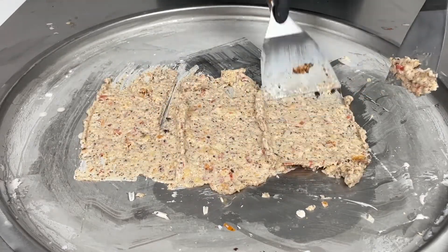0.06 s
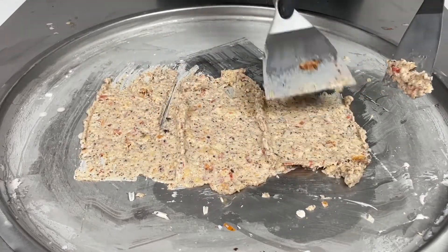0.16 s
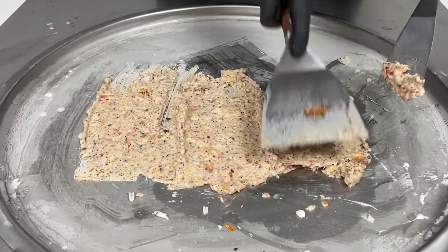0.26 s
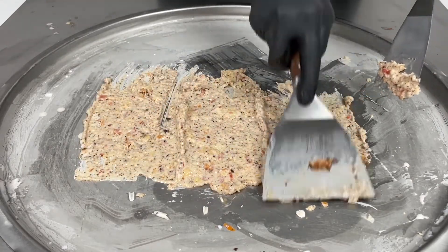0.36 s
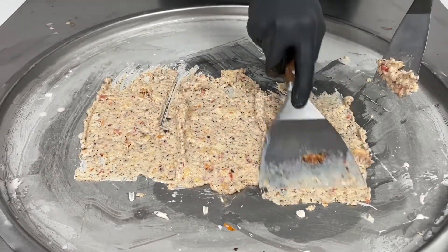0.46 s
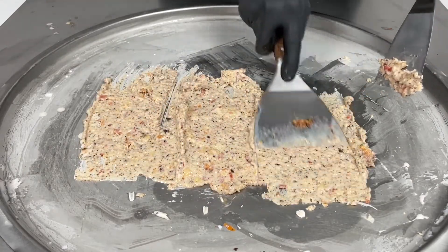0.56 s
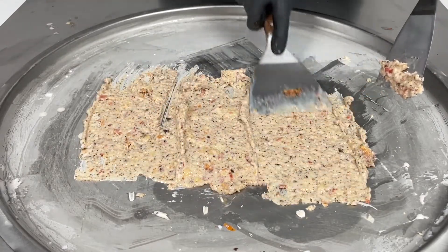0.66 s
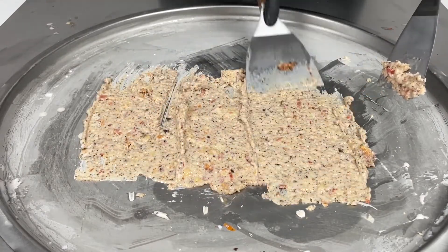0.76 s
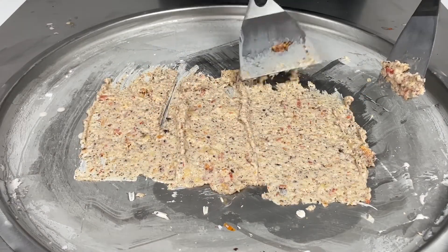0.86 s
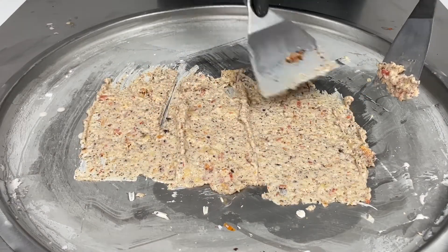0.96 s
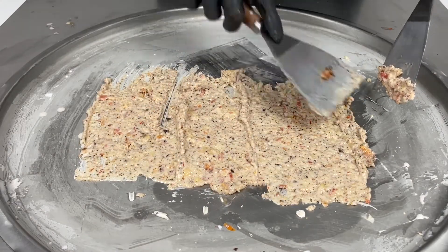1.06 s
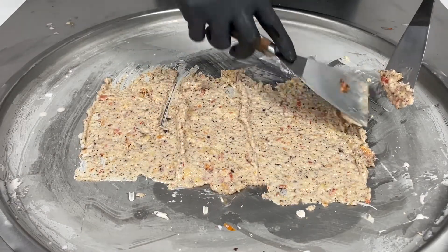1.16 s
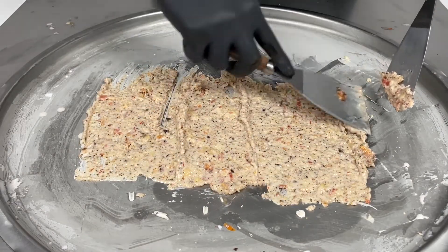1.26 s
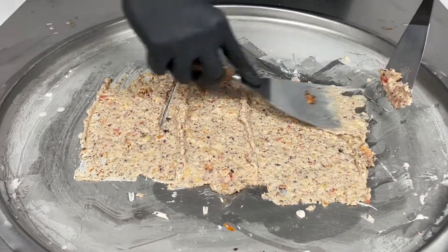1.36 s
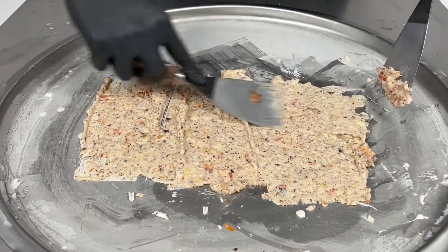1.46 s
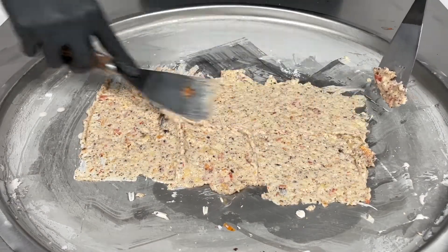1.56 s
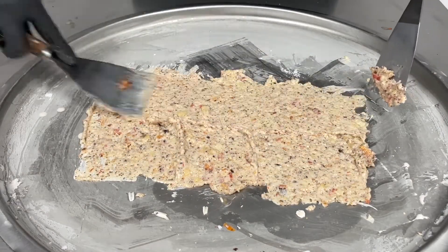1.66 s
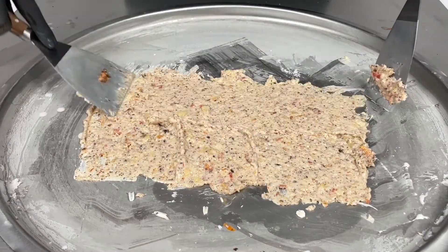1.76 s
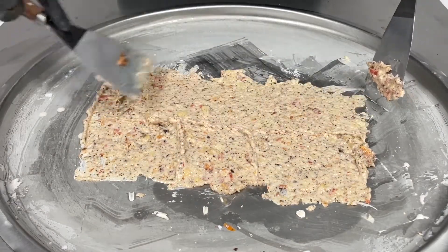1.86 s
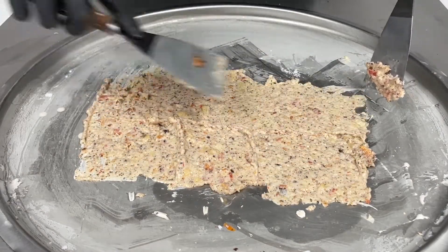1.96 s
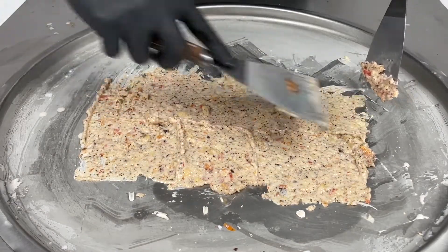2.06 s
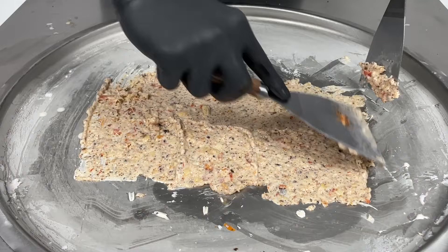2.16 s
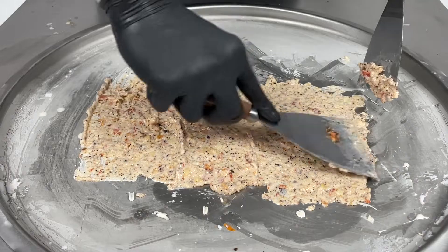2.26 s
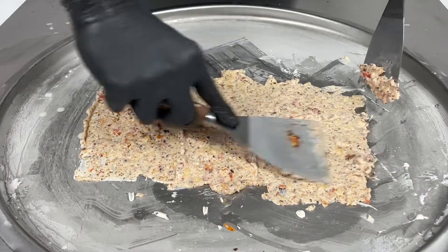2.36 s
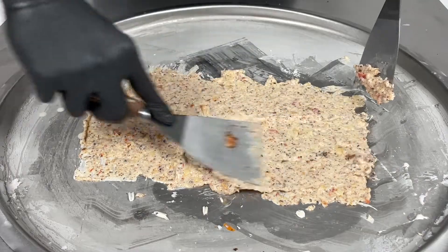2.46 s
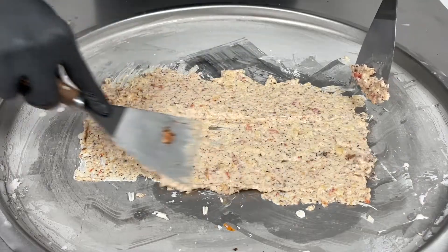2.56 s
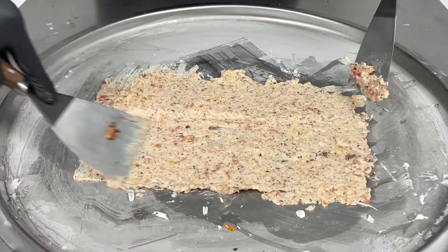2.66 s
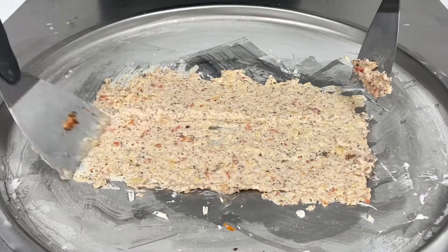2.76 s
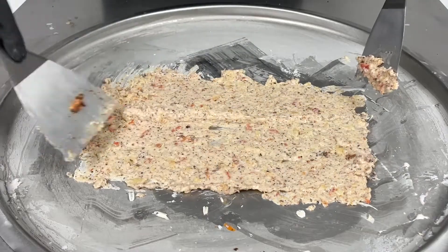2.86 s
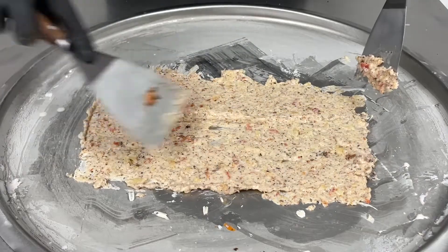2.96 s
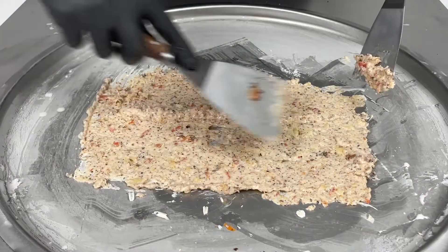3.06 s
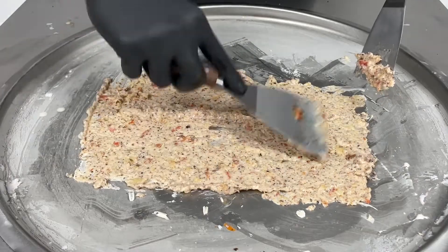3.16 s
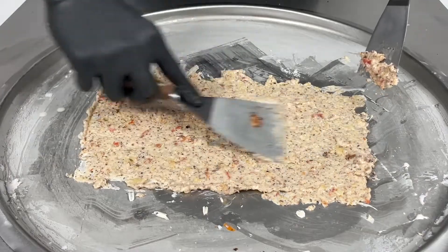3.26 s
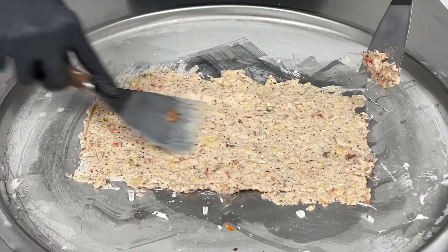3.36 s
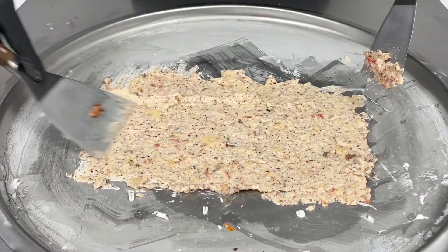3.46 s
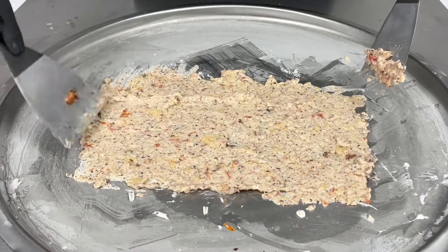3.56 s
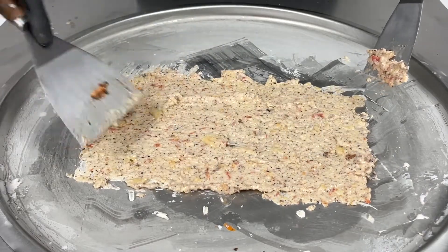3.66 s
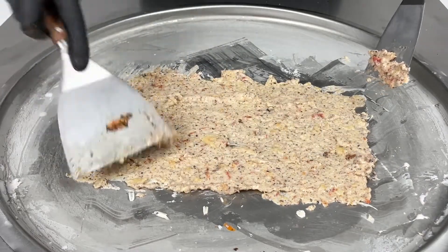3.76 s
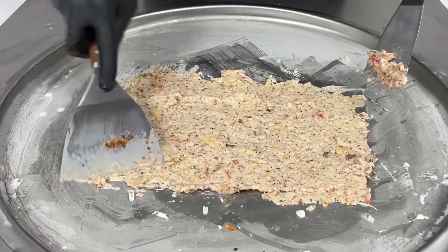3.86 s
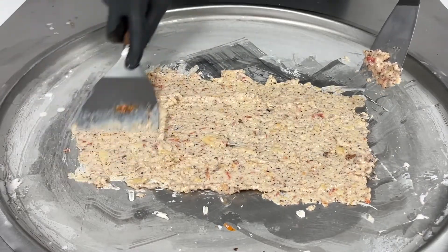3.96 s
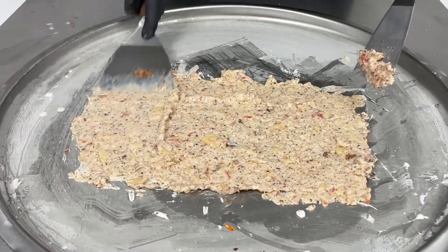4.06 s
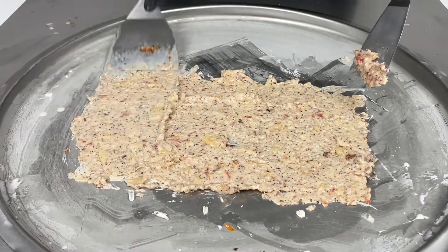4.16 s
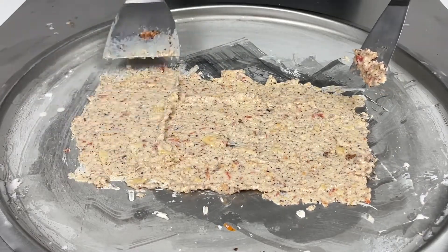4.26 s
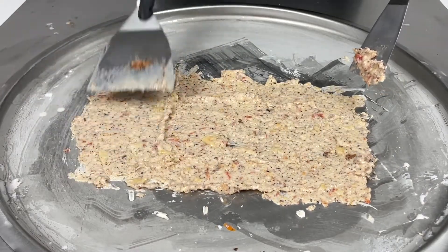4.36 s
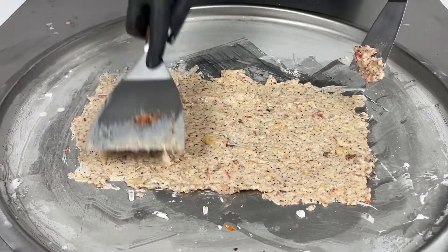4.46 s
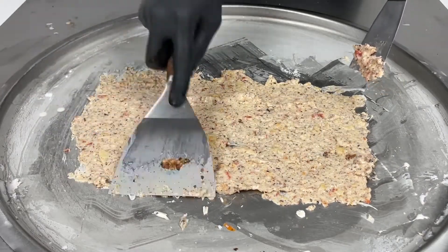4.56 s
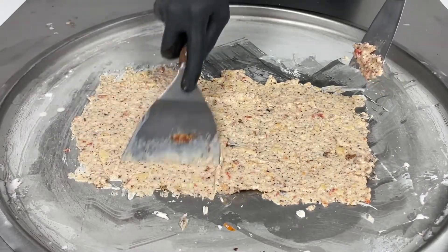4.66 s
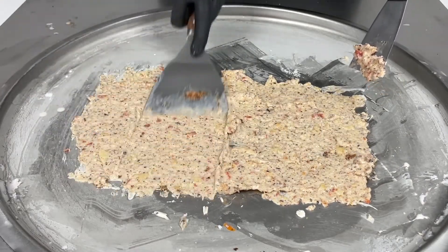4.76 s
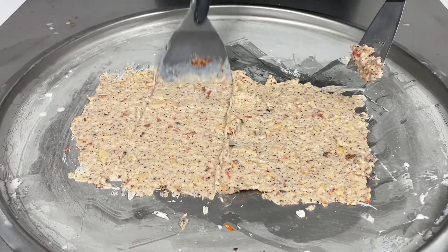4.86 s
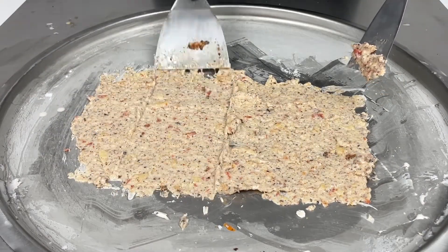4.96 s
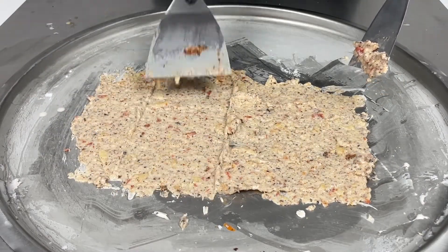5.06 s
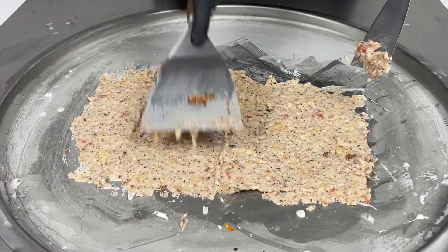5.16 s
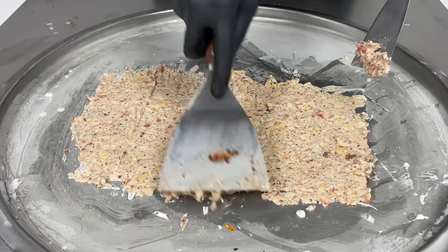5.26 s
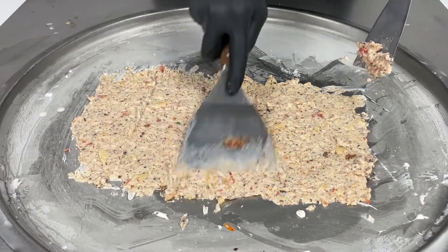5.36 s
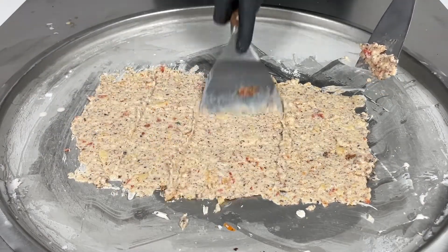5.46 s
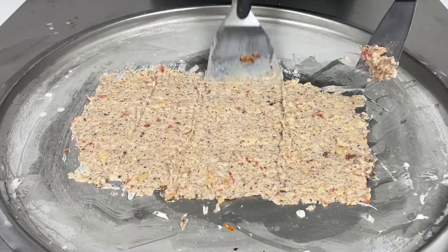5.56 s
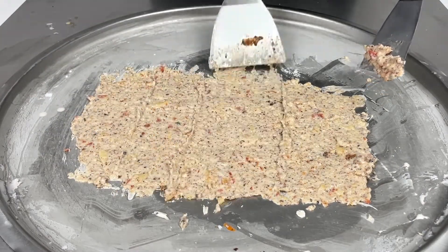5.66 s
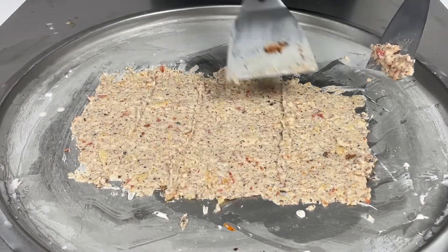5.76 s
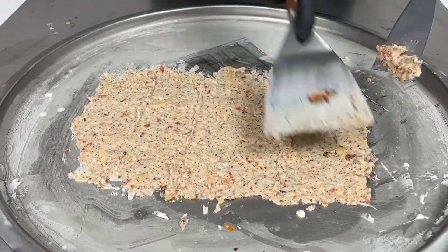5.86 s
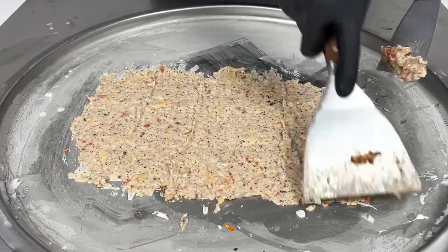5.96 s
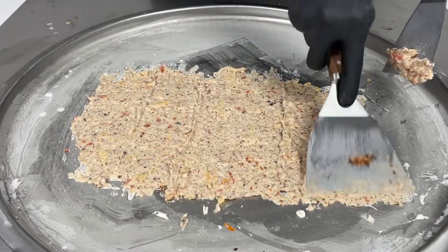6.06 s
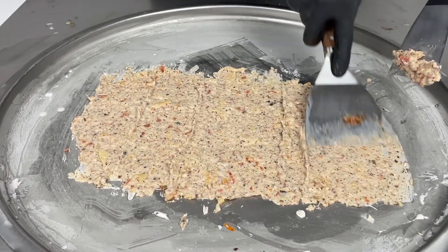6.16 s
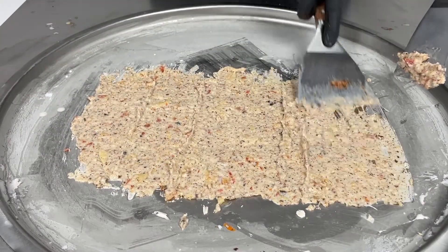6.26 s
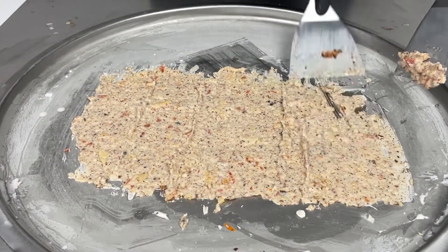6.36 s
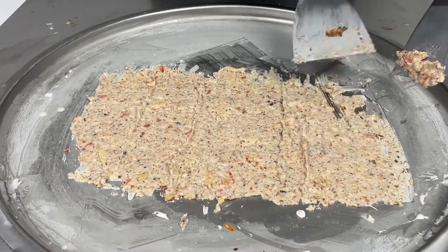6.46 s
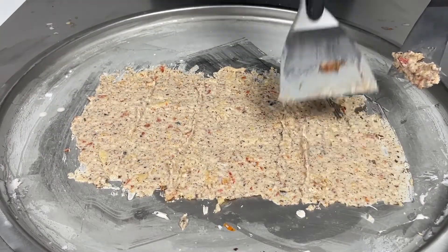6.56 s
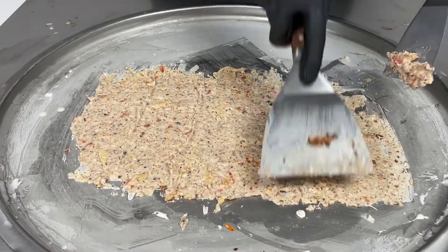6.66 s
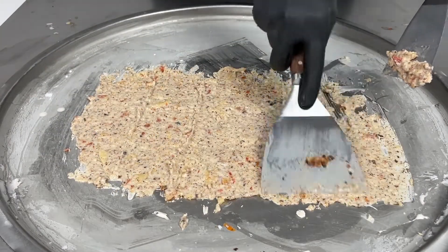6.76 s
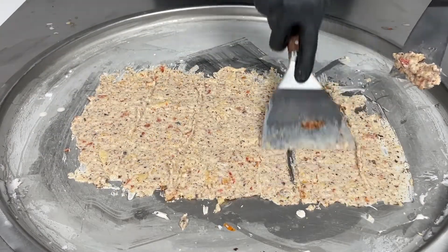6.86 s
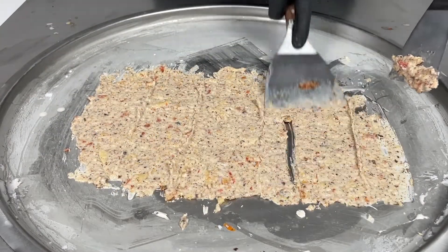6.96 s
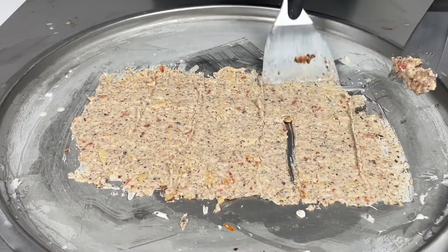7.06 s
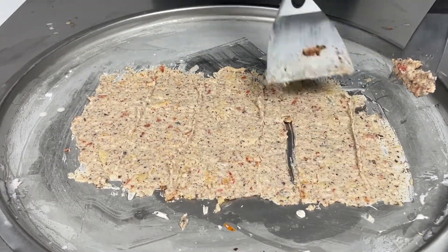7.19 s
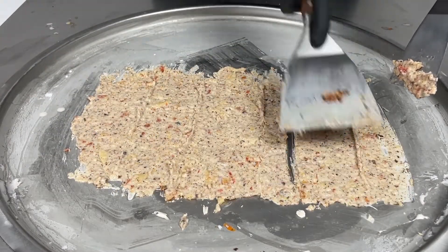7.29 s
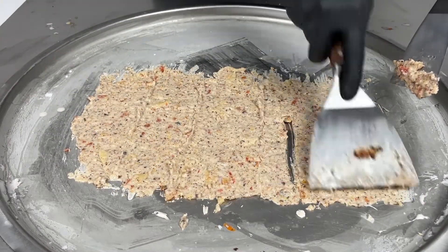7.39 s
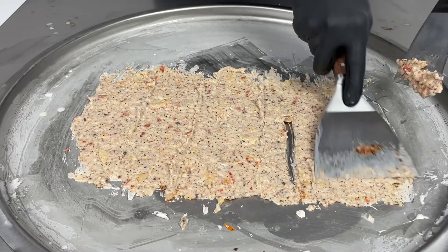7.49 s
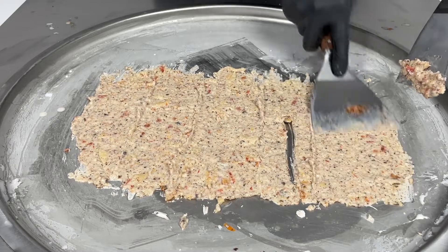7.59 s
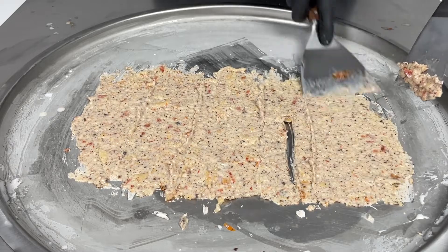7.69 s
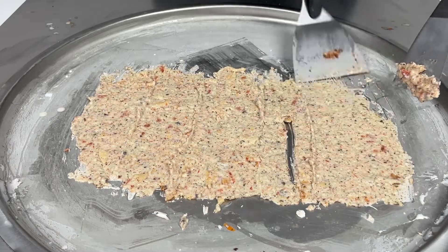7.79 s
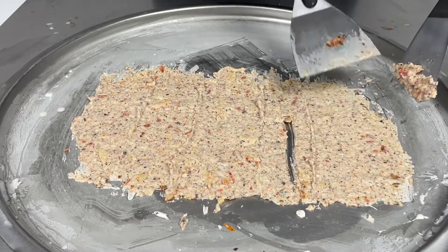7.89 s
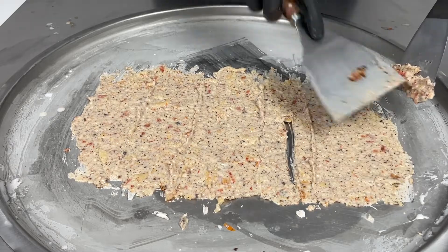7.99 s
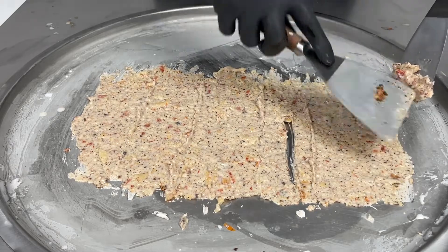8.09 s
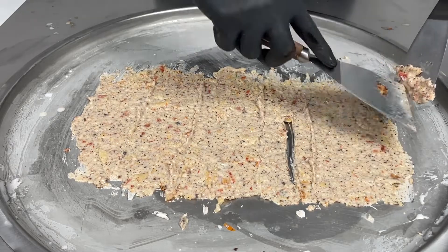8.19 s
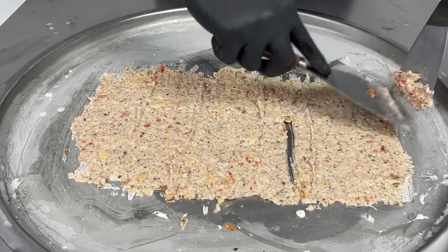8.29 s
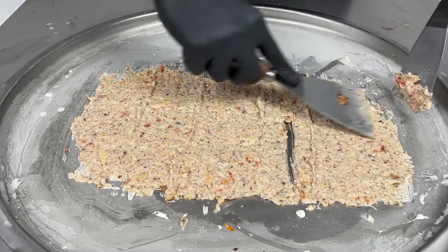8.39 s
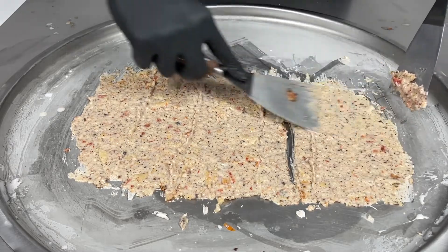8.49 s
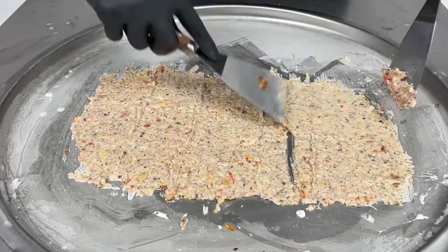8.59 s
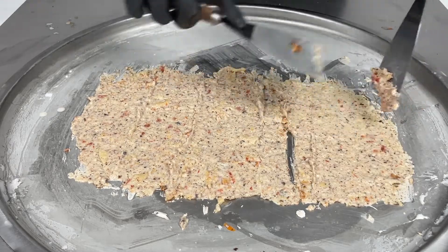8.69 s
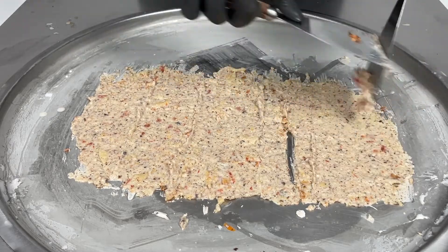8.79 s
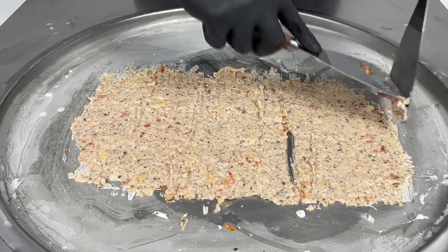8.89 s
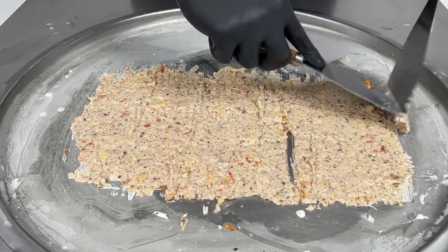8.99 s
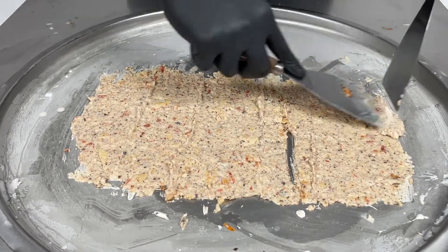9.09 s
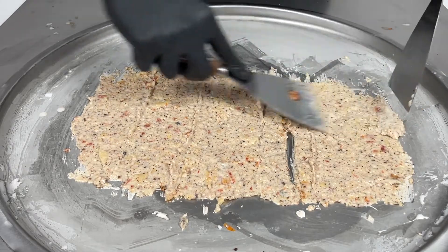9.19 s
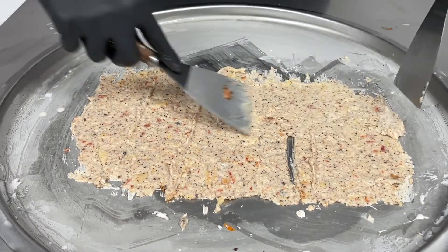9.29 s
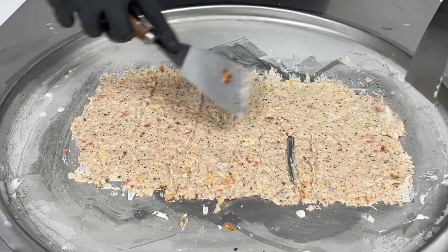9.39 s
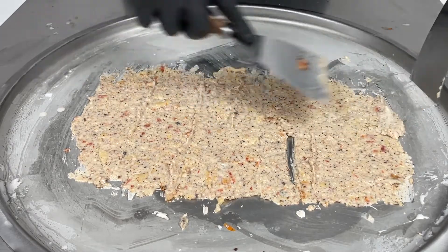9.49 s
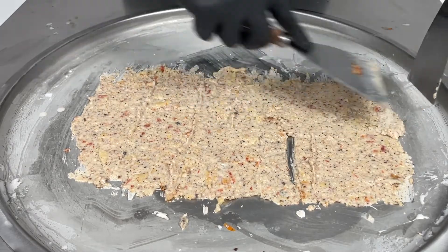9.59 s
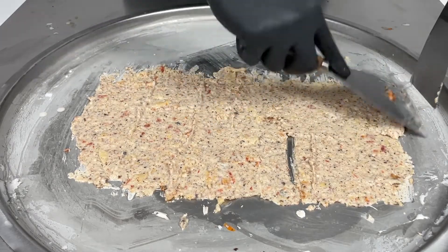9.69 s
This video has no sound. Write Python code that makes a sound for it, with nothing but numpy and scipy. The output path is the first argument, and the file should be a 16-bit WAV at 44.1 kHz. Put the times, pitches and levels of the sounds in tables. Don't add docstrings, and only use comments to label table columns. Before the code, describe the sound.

Short gritty scraping strokes on a cold steel plate, crumbs fizzing and lumps snapping, over chiller hum; later a tap and a hard metallic clack.

```python
import sys
import numpy as np
from scipy import signal
from scipy.fft import rfft, irfft, next_fast_len
from scipy.io import wavfile
from scipy.ndimage import uniform_filter1d, map_coordinates

SR = 44100
rng = np.random.default_rng(int(sys.argv[2]) if len(sys.argv) > 2 else 0)


def gain_from_db(level_db):
    decades = np.asarray(level_db, float) / 20
    return 10 ** decades


def persist_wave(psi):
    counts = np.round(np.clip(psi, -1, 1) * 32767).astype(np.int16)
    wavfile.write(sys.argv[1], SR, np.atleast_2d(counts).T)


N = 429093


def unit(x):
    return x / np.sqrt(np.mean(x ** 2) + 1e-20)


def along(points, hz):
    f, v = np.transpose(points)
    return np.interp(np.log(hz + 1), np.log(f + 1), v)


def wobble(rate):
    knots = rng.standard_normal(int(N * rate / SR) + 4)
    return map_coordinates(knots, [np.arange(N) * rate / SR])


def filtered(x, response):
    m = next_fast_len(len(x) + 4096)
    return irfft(rfft(x, m) * response(np.fft.rfftfreq(m, 1 / SR)), m)[:len(x)]


def coloured(x, spectrum):
    return unit(filtered(x, lambda hz: gain_from_db(along(spectrum, hz))))


def resonant(x, peaks):
    def response(f):
        total = 0
        for k, (centre, width, db) in enumerate(peaks):
            damping = 1j * f * width
            total = total + (-1) ** k * gain_from_db(db) * damping / (centre ** 2 - f * f + damping)
        return total
    return filtered(x, response)


def hollow(x):
    gap_hz = 12500
    return filtered(x, lambda f: (gap_hz ** 2 - f * f + 1j * f * 800) / (gap_hz ** 2 - f * f + 1j * f * 3500))


def grit(rate, spread_db, bed, life):
    hits = rng.random(N) < rate / SR * gain_from_db(2.5 * wobble(40))
    size = gain_from_db(np.minimum(spread_db * rng.exponential(1, N), 8))
    puffs = signal.lfilter([1], [1, -np.exp(-1 / (life * SR))], hits * size)
    return (unit(puffs) + bed) * rng.standard_normal(N)


def patchy(x, depth_db):
    z = signal.stft(x, nperseg=256)[2]
    field = uniform_filter1d(rng.standard_normal(z.shape), size=5, axis=0)
    field = uniform_filter1d(field, size=7, axis=1)
    return unit(signal.istft(z * gain_from_db(depth_db * unit(field)), nperseg=256)[1][:N])


def add(track, s, sound):
    part = track[round(s * SR):][:len(sound)]
    part += sound[:len(part)]


# f/Hz, t60/s
REVERB_TIME = [(150, 0.75), (1000, 0.53), (4000, 0.67), (9000, 0.4), (16000, 0.24)]


def kitchen(x):
    hz, t, z = signal.stft(rng.standard_normal(int(0.98 * SR)), SR, nperseg=256)
    decay = gain_from_db(-60 * t / along(REVERB_TIME, hz)[:, None])
    tail = signal.istft(z * decay, SR, nperseg=256)[1]
    return signal.fftconvolve(np.pad(x, (300, 0)), tail / np.linalg.norm(tail))[:len(x)]


def blow(contacts, modes, colour, ring_db, crack_s, wet_db, blur_hz):
    start = contacts[0][0]
    cracks, rings, t = np.zeros(SR), np.zeros(SR), np.arange(SR // 2) / SR
    for s, db, more_db in contacts:
        noise = coloured(rng.standard_normal(len(t)), colour)
        onset = 1 - np.exp(-t / (crack_s / 40))
        add(cracks, s - start, gain_from_db(db - 8.0 - 60 * t / crack_s) * onset * noise)
        steps = rng.standard_normal((len(modes), len(t)))
        drift = np.sqrt(2 * np.pi * blur_hz / SR) * np.cumsum(steps, axis=1)
        drift = uniform_filter1d(drift, size=48, axis=1)
        ring = np.zeros(len(t))
        for (hz, level, t60), turn in zip(modes, drift):
            decay = gain_from_db(level + rng.normal(0, 1.5) - 60 * t / t60)
            ring += decay * np.sin(2 * np.pi * hz * t + turn)
        add(rings, s - start, gain_from_db(db + ring_db + more_db) * ring)
    spread = coloured(signal.unit_impulse(SR, idx=300), colour) * np.std(cracks)
    both = cracks + rings + gain_from_db(wet_db) * kitchen(spread + rings)
    out, low_hz = np.zeros(N), 1.05 * colour[0][0]
    add(out, start, filtered(both, lambda hz: (1j * hz / (low_hz + 1j * hz)) ** 2))
    return out


# f/Hz, level/dB
AIR_COLOUR = [(25, -35), (60, 4), (134, -9), (257, -9), (319, -9), (454, -13), (801, -14.5), (1270, -18.5),
              (1620, -22), (4600, -26), (7800, -30.5), (10000, -38), (12700, -44), (15300, -35)]


def chiller():
    hum_hz = 49.3 + 0.7 * wobble(5.3)
    hum = gain_from_db(-61.5 + 1.4 * wobble(3.7)) * np.sin(2 * np.pi * np.cumsum(hum_hz) / SR)
    air = coloured(rng.standard_normal(N), AIR_COLOUR)
    air = filtered(air, lambda hz: hz ** 4 / (hz ** 4 + 70.0 ** 4))
    return hum + gain_from_db(-62 + 0.28 * wobble(4.22)) * air


def pressure(rows, fade_scale):
    t, power, land_s = np.arange(N) / SR, np.full(N, 1e-12), 0.008
    for s, length, land_db, lift_db, t60 in rows:
        fade = t60 * fade_scale
        db = np.interp(t, [s, s + length, s + length + fade], [land_db, lift_db, lift_db - 60])
        bite = np.clip((t - s) / land_s, 0, 1) * (t < s + length + fade)
        power = power + (gain_from_db(db) * bite) ** 2
    return power


def shudder():
    out, t = np.zeros(N), np.arange(SR // 2) / SR
    shakes = [(s, db - 16) for s, db, *_ in LANDINGS]
    shakes.append((BANG_CONTACTS[1][0], -41))
    for s, db in shakes:
        add(out, s, gain_from_db(db - 60 * t / 0.54) * (1 - np.exp(-t / 0.015)))
    return out


# start t/s, length t/s, landing level/dB, lift-off level/dB, fade t60/s
STROKES = [(-0.1, 0.1, -55.5, -55, 0.51), (0.372, 0.075, -63, -62, 0.22), (0.445, 0.19, -57, -58, 0.15),
           (0.645, 0.1, -53, -55, 0.29), (1.215, 0.038, -66, -63.5, 0.17), (1.39, 0.043, -62, -55, 0.1),
           (1.44, 0.29, -51, -51.5, 0.38), (2.19, 0.11, -67.5, -58.5, 0.29), (2.31, 0.44, -52, -55.5, 0.37),
           (2.69, 0.017, -45.5, -44.5, 0.32), (2.8, 0.34, -64, -65, 0.34), (3.16, 0.3, -59.5, -49, 1),
           (3.835, 0.24, -59, -48, 0.67), (4.555, 0.305, -58.5, -49.5, 0.73),
           (5.28, 0.11, -70.5, -52, 0.19), (5.385, 0.21, -48, -56.5, 0.34), (5.98, 0.37, -54.5, -49, 0.56),
           (6.72, 0.26, -56, -49, 0.62), (9.17, 0.098, -58.5, -50.5, 0.51)]
# start t/s, length t/s, landing level/dB, lift-off level/dB, fade t60/s
SKIMS = [
    (4.36, 0.19, -68, -66, 0.2),
    (1.257, 0.2, -56, -61, 0.45),
    (3.159, 0.011, -49.5, -52, 0.16),
    (7.408, 0.085, -64, -62, 0.23),
    (7.495, 0.055, -48, -53, 1.75),
    (8.281, 0.185, -58, -55, 0.5),
    (8.97, 0.19, -59.5, -58.5, 0.29),
    (9.66, 0.067, -63, -57.5, 0.27),
]
# f/Hz, level/dB
RASP_COLOUR = [(240, -66), (400, 0.5), (686, -5.5), (856, 1), (1270, 2.5), (1890, 1), (5000, -16),
               (6500, -37), (11000, -120)]
# f/Hz, level/dB
FIZZ_COLOUR = [(1800, -13), (2800, -3), (3600, -0.5), (5500, 1), (8300, -2), (10000, -13), (12800, -24),
               (14500, -13.5), (15400, -7.5), (16600, 1.5)]
# centre f/Hz, width f/Hz, level/dB
PLATE_MODES = [(121.6, 54.5, 0.5), (196.8, 43, -3), (330, 67, -8)]


def strokes():
    rasp_db = 10 * np.log10(pressure(STROKES + SKIMS, 0.98))
    full_power = 1e-5
    crushing = full_power * (pressure(STROKES, 0.78) / full_power) ** 0.97
    skimming = pressure(SKIMS, 0.99)
    fizz_db = 10 * np.log10(gain_from_db(2 * -5) * crushing + gain_from_db(2 * 1.5) * skimming)
    over_db = rasp_db + 52
    thrum_db = 20 * np.log10(gain_from_db(-61 + 0.56 * over_db) + shudder())
    bend_hz = np.maximum(1950 + 20 * over_db + 230 * wobble(7), 1200)
    judder = wobble(30)
    crumbs = grit(rate=180.0, spread_db=1.0, bed=1.5, life=0.0023)
    broad = patchy(coloured(crumbs, RASP_COLOUR), depth_db=2.5)

    def slow():
        return filtered(grit(rate=94.0, spread_db=-0.5, bed=0.78, life=0.0027), lambda hz: 1 / (1 + 1j * hz / 90))

    phase = 2 * np.pi * np.cumsum(bend_hz) / SR
    sung = unit(slow() * np.cos(phase) + slow() * np.sin(phase))
    rasp = gain_from_db(rasp_db - 3.03 + 0.58 * judder) * unit(broad + 0.62 * sung)
    fizz = patchy(coloured(crumbs, FIZZ_COLOUR), depth_db=2.0)
    fizz = gain_from_db(fizz_db + 0.71 * judder + 0.87 * wobble(120)) * fizz
    thrum = gain_from_db(thrum_db + 1.06 * wobble(14)) * unit(resonant(rng.standard_normal(N), PLATE_MODES))
    splits = (rng.random(N) < 260 / SR) * rng.standard_normal(N)
    crackle = hollow(resonant(splits, [(2600, 1200, 5.5), (6000, 3300, 0), (15500, 1200, -5)]))
    return rasp + fizz + thrum + gain_from_db(fizz_db + 12) * crackle


# t/s, peak level/dB, sway level/dB, knock level/dB
LANDINGS = [(0.373, -42, -5, -2.5), (0.542, -48.5, -20, -5), (1.185, -49, -20, -20), (1.578, -45, -21, -27),
            (2.185, -45, -11, -20), (2.516, -49, -15, 3), (2.699, -50.5, -6, 0), (3.171, -47, -0.5, -12),
            (3.854, -44, -16, -20), (4.561, -47.5, -2, -2), (4.928, -40, -15, 0), (4.97, -39.5, -11, -6.5),
            (5.395, -49.5, -15, 2), (5.459, -45, -19, -13), (5.582, -45.5, -21, -14),
            (5.98, -34, -11.5, -4), (6.319, -41.5, -21, 1), (6.725, -41.5, -2.5, -10.5),
            (6.887, -54, -7, 3), (7.421, -40, -5, -8.5), (7.498, -40.5, -11, -16), (8.286, -41, -14, -8.5),
            (9.664, -46, -23.5, -4.5)]


def landings():
    out, t = np.zeros(N), np.arange(SR // 5) / SR

    def ring(hz, t60):
        envelope = gain_from_db(-60 * t / t60) * (1 - np.exp(-t / 0.0071))
        return envelope * np.sin(2 * np.pi * hz * gain_from_db(rng.normal(0, 0.82)) * t)

    for s, db, sway_db, knock_db in LANDINGS:
        plate = ring(132.2, 0.21) + 0.66 * ring(187.0, 0.13)
        squash = unit(resonant(rng.standard_normal(len(t)), [(270, 160, 0.5), (676, 530, -4)]))
        squash = squash * gain_from_db(-60 * t / 0.15) * (1 - np.exp(-t / 0.0036))
        knock = 0.78 * ring(355, 0.086) + 0.83 * ring(427, 0.1) + 0.39 * squash
        sway = ring(67.5, 0.32)
        add(out, s, gain_from_db(db + 2.0) * (plate + gain_from_db(sway_db) * sway + gain_from_db(knock_db) * knock))
    return out


# t/s, peak level/dB, blade f/Hz
LUMPS = [(0.3748, -45.5, 2170), (9.668, -38.5, 1750), (0.4324, -53, 1780), (4.635, -41, 1940),
         (4.8445, -35, 3600), (5.3912, -32, 1400), (6.959, -35, 3060), (0.534, -39.5, 1470),
         (0.551, -37, 1390), (0.669, -43, 2020), (1.5527, -34.5, 1711), (2.481, -41, 1650),
         (2.6972, -36.5, 2970), (3.3006, -39, 1830), (3.3428, -36.5, 1460), (3.4792, -37, 2344),
         (3.924, -36.5, 1947), (3.9247, -38.5, 4000), (4.1671, -40, 1450), (5.4859, -39.5, 3480),
         (6.0286, -36.5, 1950), (6.1884, -35, 2123), (6.3857, -32.5, 1230), (6.9262, -38, 1480),
         (7.0548, -36, 1180), (8.4823, -39, 2616),
         (0.4055, -50, 2160), (0.7346, -46, 1660), (1.2248, -53, 1083), (1.4052, -49, 1864),
            (1.5354, -41.5, 2070), (2.1818, -52, 1290), (2.2836, -49, 1190), (2.4428, -57, 1944),
            (2.6896, -39, 1240), (2.7048, -34.5, 1910), (3.269, -46, 1830), (3.3839, -43, 1830),
            (3.4057, -45, 1820), (3.4304, -40.5, 1840), (3.8656, -42, 1962), (3.9509, -38, 2030),
            (3.9854, -43, 1180), (4.0131, -43, 1890), (4.7735, -47, 1046), (5.341, -50, 1672),
            (5.3718, -36.5, 2030), (5.5337, -37, 2020), (5.5784, -38, 1900), (6.771, -53, 1760),
            (6.7988, -43, 1877), (6.8247, -45, 1710), (6.8872, -40, 1860), (6.8975, -41, 1562),
            (7.444, -46, 1794), (7.6764, -38.5, 1770), (7.9758, -49.5, 3500), (8.4342, -37.5, 2390),
            (8.4614, -45, 2450), (8.509, -42, 2270), (8.7051, -49, 2480), (9.2569, -39, 1800)]
# t/s, peak level/dB, brightness level/dB, blade f/Hz
TOUCHES = [(0.447, -33, -23, 1670), (0.4694, -34, -5.5, 1730), (1.2582, -31, -6, 2260),
           (1.281, -35.5, -2, 3440), (2.213, -45.5, 5.5, 2500), (2.3106, -42, 9.5, 3540),
           (2.3233, -34, 1, 1960), (3.1612, -35.5, 3, 2230), (3.1684, -45, 5, 3370),
           (3.8338, -30, -5, 2115), (4.8378, -32, -14, 3700), (5.2803, -49, -4, 1526),
           (5.3835, -29.5, -25, 2030), (5.982, -30.5, -6, 1733), (5.989, -45, -27, 2170),
           (6.3112, -43.5, 8.5, 1650), (0.6556, -46, 5, 4450), (6.2501, -46, 10, 2500),
           (6.7263, -40, -4, 1406), (7.4102, -46, 5.5, 1483), (8.282, -38, -8, 1480), (8.317, -42, 5, 1311),
           (9.247, -45, 0, 2045), (9.6613, -34.5, -2.5, 1780)]
# t/s, peak level/dB
CRYSTALS = [(0.5596, -45), (0.6689, -57), (1.2241, -53), (1.5339, -44), (1.6147, -46), (2.1814, -55),
            (2.3476, -49), (2.384, -56), (2.4369, -57), (2.4538, -51), (2.5077, -45), (2.5611, -52),
            (2.58, -49), (2.6663, -50), (3.2575, -52.5), (3.2774, -47), (3.3154, -45), (3.4027, -49),
            (3.4216, -48.5), (3.8856, -41), (3.9843, -48), (4.0477, -51), (4.0966, -55), (4.6019, -45),
            (4.6768, -49), (4.7905, -58), (5.3712, -50), (5.4166, -48), (5.5328, -51), (5.6441, -56),
            (6.0511, -41), (6.2163, -46), (6.3106, -37), (6.7206, -57), (6.7615, -56), (6.8254, -41),
            (6.9336, -45), (7.4619, -52), (7.647, -50), (7.6765, -43.5), (7.7643, -53), (8.3764, -46),
            (8.3834, -42), (8.5779, -53), (9.191, -52), (9.2125, -54)]


def ticks():
    out, t = np.zeros(N), np.arange(3000) / SR
    touch_t60, lump_t60, crystal_t60 = 0.0048, 0.014, 0.0075
    touches = [(*row, touch_t60) for row in TOUCHES]
    lumps = [(s, db, -17, hz, lump_t60) for s, db, hz in LUMPS]
    snaps = [(s, db, bright_db - 3.5, hz, lump_t60) for s, _, db, bright_db, hz in CATCHES]

    def thin(x, hz):
        peaks = [(hz, 5500, 0), (15400, 2200, -1.5)]
        return resonant(resonant(x, peaks), peaks)

    for s, db, bright_db, hz, t60 in touches + lumps + snaps:
        decay = gain_from_db(-60 * t / t60) + 0.15 * gain_from_db(-60 * t / 0.078)
        burst = rng.standard_normal((2, len(t))) * decay * (1.1 - np.exp(-t / (t60 / 16)))
        burst[1] *= gain_from_db(-60 * t / 0.13)
        crack = resonant(burst[0], [(hz, 380, 4), (hz * 2.16, 1500, -8), (900, 700, -5)])
        spit = thin(burst[1], 6600 * gain_from_db(rng.normal(0, 0.62)))
        crack, spit = crack / abs(crack).max(), spit / abs(spit).max()
        add(out, s, gain_from_db(db) * (crack + gain_from_db(bright_db + 1.5) * spit))
    for s, db in CRYSTALS:
        click = thin(rng.standard_normal(len(t)) * gain_from_db(-60 * t / crystal_t60), 7800)
        add(out, s, gain_from_db(db + 1.5) * click / abs(click).max())
    return hollow(out)


# t/s, tear level/dB, snap level/dB, brightness level/dB, blade f/Hz
CATCHES = [(0.6549, -35.5, -53, 0, 1506), (1.4429, -20.5, -34, -13.5, 1930), (1.578, -30, -37, -6, 1850),
           (1.67, -34, -36, -9, 1950), (1.703, -31, -42, -8.5, 1780), (2.3437, -31, -59, -11, 1800),
           (2.522, -34, -32.5, -10, 1548), (4.031, -29, -53, -25, 1890), (4.0444, -24, -31.5, -10.5, 1895),
           (4.56, -30.5, -36, -7.5, 1000), (4.655, -30, -44, -30, 2080), (4.69, -37, -55, -28, 2108),
           (6.21, -33, -55, -35, 2120), (8.436, -36, -50, -12, 2450), (4.7403, -40, -31.5, -32, 3430),
           (4.8372, -27, -28.5, -17, 2162), (5.5729, -32.5, -38, -4.5, 1860),
           (6.117, -29.5, -45, -22, 1832), (6.1807, -30, -27.5, -10, 1462), (6.275, -31, -53, -41, 2010),
           (6.3111, -33, -51, 2, 1690), (6.327, -28, -27, -6.5, 1600), (6.375, -27, -42, -32, 1270),
           (6.957, -50, -32.5, -34, 1530), (7.661, -28.5, -48, -11.5, 1687), (8.402, -37, -42, 4.5, 2460),
           (9.191, -36, -40.5, 1.5, 1396), (9.2699, -38.5, -42, 3.5, 1807)]


def catches():
    out, t = np.zeros(N), np.arange(8000) / SR
    for s, db, _, bright_db, hz in CATCHES:
        noise = rng.standard_normal((2, len(t)))
        blade = unit(resonant(noise[0], [(hz, 150, 5), (3550, 500, -7), (800, 600, -11)]))
        tear = blade + gain_from_db(bright_db + 10.0) * coloured(noise[1], FIZZ_COLOUR)
        add(out, s, gain_from_db(db - 16.0 - 60 * t / 0.13) * (1 - np.exp(-t / 0.005)) * tear)
    return out


# t/s, peak level/dB, ring level/dB
JINGLE_CONTACTS = [
    (2.845, -84, 0.1),
    (2.955, -70, 0.11),
    (2.995, -67.5, 0.1),
    (3.015, -80, 0.085),
]
# f/Hz, level/dB, t60/s
JINGLE_MODES = [(6024, -5, .15), (8050, -2, .25), (8974, -7, 0.16), (9600, -6, 0.16), (10700, -5, 0.17),
                (12300, -10, .15), (14700, -9, .12)]


def jingle():
    return blow(JINGLE_CONTACTS, JINGLE_MODES, FIZZ_COLOUR, ring_db=-5, crack_s=.01, wet_db=-9, blur_hz=25)


# t/s, peak level/dB, ring level/dB
BANG_CONTACTS = [
    (4.3315, -33, 0.13),
    (4.337, -16.5, 0.13),
    (4.345, -22.5, 0.089),
    (4.369, -20, 0.082),
    (4.41, -23.5, 0.11),
]
# f/Hz, level/dB, t60/s
BANG_MODES = [(180.2, -7.5, 0.56), (358, -9.5, 0.47), (433.6, -5, 0.29), (500, -8, .27), (678, -6, .4),
              (813, -11, .3), (955, -6.5, 0.31), (1006, -6, 0.29), (1058, -22, .4), (1367, -5.5, 0.29),
              (1567, -5.5, 0.26), (1860, -16, .4), (2240, -17, .3)]
# f/Hz, level/dB
BANG_COLOUR = [(50, -50), (100, -32), (165, -6), (260, -15), (400, -3.5), (600, -12), (960, 0),
               (1300, -8.5), (1850, -10.5), (2900, -21.5), (4500, -39.5), (9000, -66), (12000, -80)]


def bang():
    return blow(BANG_CONTACTS, BANG_MODES, BANG_COLOUR, ring_db=-25, crack_s=0.044, wet_db=4.0, blur_hz=10.5)


# t/s, peak level/dB, ring level/dB
TAP_CONTACTS = [
    (7.494, -29, 0.5),
    (7.4968, -14, -11),
    (7.506, -33, -5),
    (7.512, -39, -5),
]
# f/Hz, level/dB, t60/s
TAP_MODES = [(494, 2, 0.38), (1360, -6, .4), (1605, 3, 0.43), (2520, 4, 0.49), (3311, 5, 0.66),
             (3530, 6.5, 0.8), (5140, 2, 0.36), (6500, -14, 0.36), (7700, -9, 0.33)]
# f/Hz, level/dB
TAP_COLOUR = [(60, -25), (130, -34), (500, 6.5), (900, -30), (1550, 8), (2500, -5), (3450, 3), (4300, -15),
              (5100, -5), (6200, -16), (8200, -4), (12500, -30), (15400, -13), (16600, -19.5)]


def tap():
    return blow(TAP_CONTACTS, TAP_MODES, TAP_COLOUR, ring_db=-28.5, crack_s=0.015, wet_db=-19.0, blur_hz=110)


# t/s, peak level/dB, ring level/dB
CLACK_CONTACTS = [
    (8.7905, -13, 9.5),
    (8.7937, -6, -4.5),
    (8.7952, -9.5, -9),
    (8.8013, -11, -15.5),
    (8.8068, -14.5, 4),
]
# f/Hz, level/dB, t60/s
CLACK_MODES = [(1272, -12, .5), (1310, -10, 0.58), (1380, -9, .4), (351, -8, 0.18), (843, -10, 0.45),
               (3020, -15.5, 0.36), (3790, -4.5, 0.17), (6460, -12, 0.16), (7740, -4, 0.16),
               (8070, -9.5, 0.18), (8270, -12, .25), (15500, -10.5, .15)]
# f/Hz, level/dB
CLACK_COLOUR = [(150, -42.5), (350, -9), (700, -3.5), (1350, -1.5), (2200, 2), (3200, -3), (4000, -2.5),
                (6200, 0), (8200, 0.5), (9500, -7), (12800, -14.5), (15500, 3.5), (16600, -17)]


def clack():
    return blow(CLACK_CONTACTS, CLACK_MODES, CLACK_COLOUR, ring_db=-28.5, crack_s=0.017, wet_db=-6.0, blur_hz=110)


# t/s, peak level/dB, ring level/dB
CHINK_CONTACTS = [
    (8.995, -35.5, 0.034),
]
# f/Hz, level/dB, t60/s
CHINK_MODES = [(4390, -3, 0.26), (4820, -3, 0.22), (5300, -6, 0.13), (8300, -2, .06)]


def chink():
    return blow(CHINK_CONTACTS, CHINK_MODES, FIZZ_COLOUR, ring_db=-4, crack_s=.02, wet_db=-12, blur_hz=28)


# t/s, peak level/dB, ring level/dB
WIPE_CONTACTS = [
    (9.05, -36, -10),
    (9.065, -41, -3),
    (9.104, -29.5, -15),
    (9.135, -37, -6),
]
# f/Hz, level/dB, t60/s
WIPE_MODES = [(6900, 0.1, 0.1), (8500, -2, 0.073)]
# f/Hz, level/dB
WIPE_COLOUR = [(3500, -27), (5000, 2), (8500, -2), (12000, -11), (15200, 1)]


def wipe():
    return blow(WIPE_CONTACTS, WIPE_MODES, WIPE_COLOUR, ring_db=-8.5, crack_s=0.13, wet_db=-5.5, blur_hz=199.4)


def scene():
    tick, rub = ticks(), strokes()
    work = rub + landings() + tick + kitchen(gain_from_db(-9.0) * tick + gain_from_db(-9.5) * rub)
    blows = jingle() + bang() + tap() + clack() + chink() + wipe()
    return (chiller() + work + catches() + blows)[None]


def low_pass(x):
    return signal.sosfilt(signal.butter(12, 16670, fs=SR, output="sos"), x)


def record(dry):
    top_hz, edge_hz = 15850, 16700
    kept = filtered(dry[0], lambda hz: hz < top_hz)
    power = uniform_filter1d(np.diff(kept, prepend=0) ** 2, size=128)
    before = np.roll(uniform_filter1d(power, size=1024), shift=700)
    attack = uniform_filter1d(1. * (power > 60 * before), size=256)
    top = filtered(attack * (dry[0] - kept), lambda hz: hz < edge_hz)
    return low_pass((kept + top)[None])


dry = scene()
out = record(dry)
persist_wave(out)
```